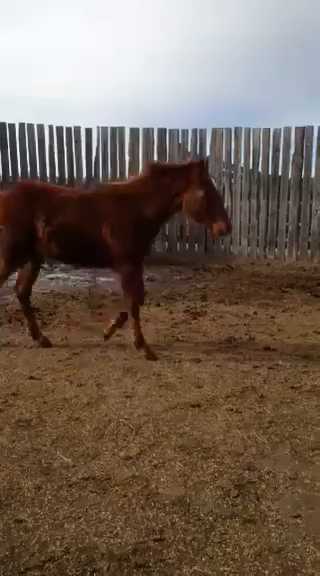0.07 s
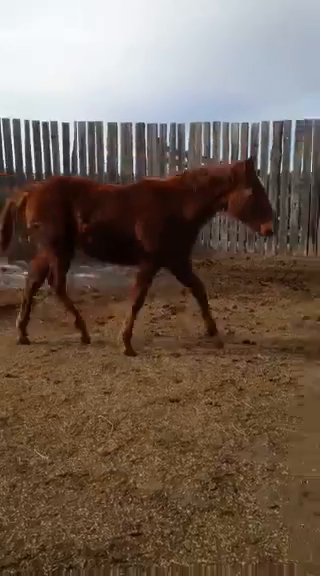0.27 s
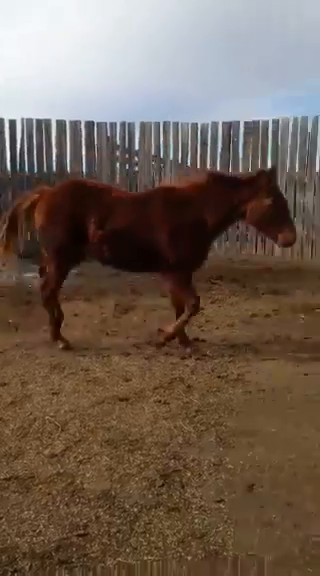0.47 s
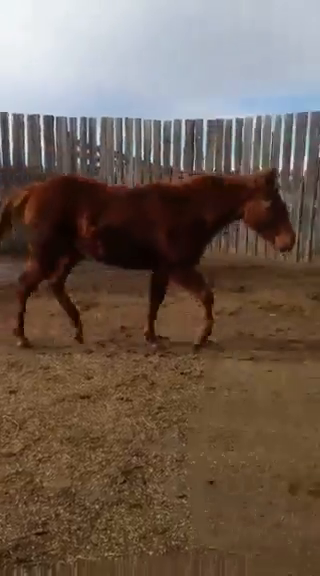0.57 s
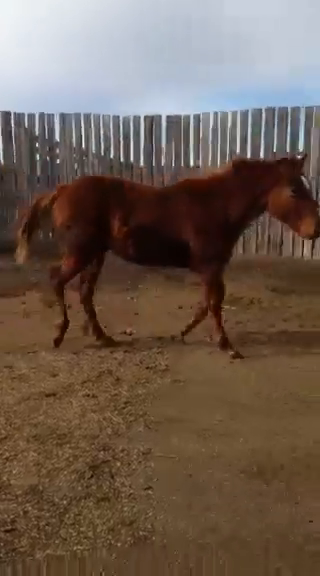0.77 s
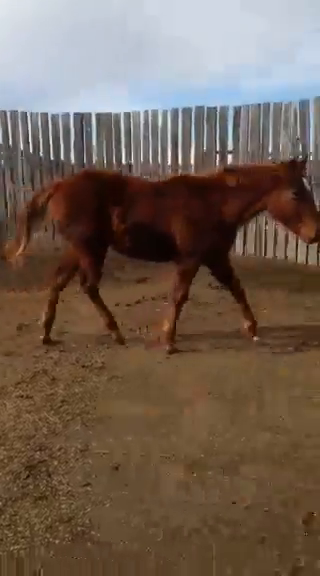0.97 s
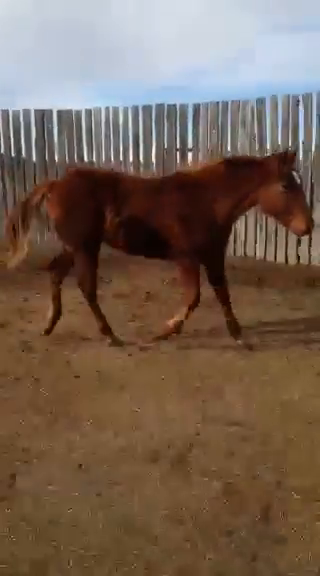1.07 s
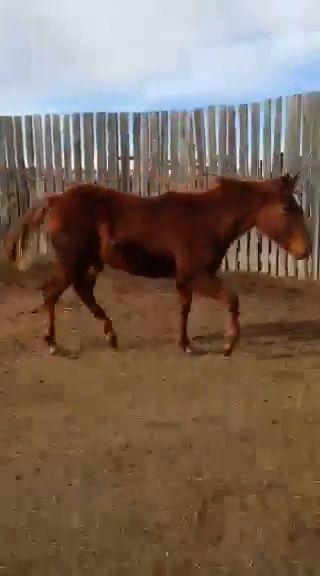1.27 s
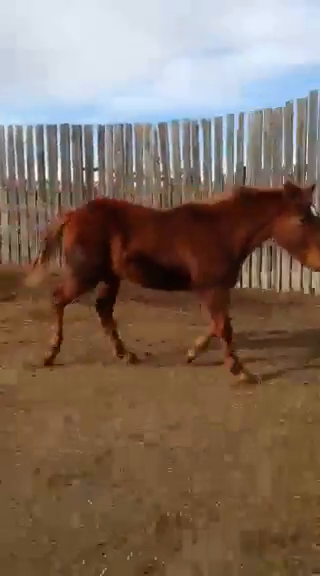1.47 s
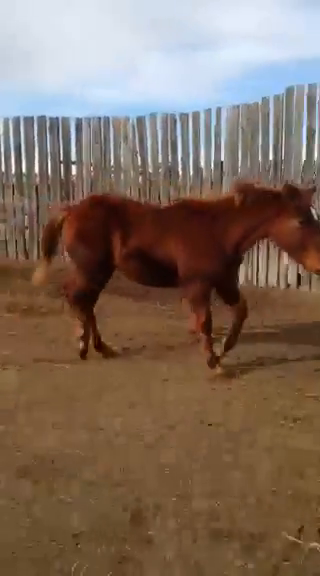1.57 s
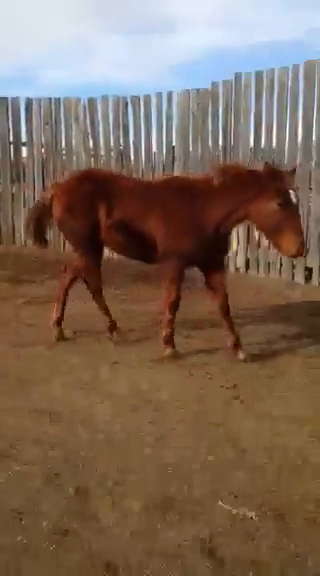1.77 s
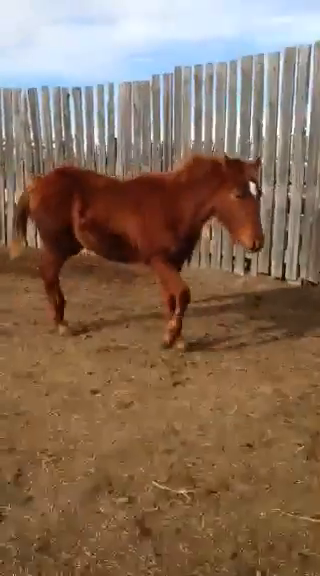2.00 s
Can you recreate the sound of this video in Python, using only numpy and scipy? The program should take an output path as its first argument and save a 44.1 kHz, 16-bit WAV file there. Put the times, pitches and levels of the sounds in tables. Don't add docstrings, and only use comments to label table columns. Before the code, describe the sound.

A horse whinnies close by: the trilling end of one call, a breathy pause, then a longer arched call that breaks, a low grunt, and another call beginning, over dull hoof thumps and wind on the microphone.

```python
import sys
import numpy as np
from scipy import signal
from scipy.fft import rfft, irfft
from scipy.io import wavfile
from scipy.ndimage import uniform_filter1d

SR = 44100
rng = np.random.default_rng(int(sys.argv[2]) if len(sys.argv) > 2 else 0)


def wrap_up_sound(samples):
    columns = np.atleast_2d(samples).T
    tamed = np.clip(columns, -1, 1)
    steps = np.round(tamed * 32767).astype(np.int16)
    wavfile.write(sys.argv[1], SR, steps)


def voltage_ratio(decibels):
    exponent = np.asarray(decibels, float) / 20
    return 10 ** exponent


N = 89919
TIME_S = np.arange(N) / SR
FREQ_HZ = np.fft.rfftfreq(N, 1 / SR)


def follow(table):
    return np.interp(TIME_S, *np.transpose(table))


def evened(x):
    return x / np.sqrt(np.mean(abs(x) ** 2) + 1e-20)


def add(mix, start_s, sound):
    part = mix[max(round(start_s * SR), 0):][:len(sound)]
    part += sound[:len(part)]


def smooth(x, hz):
    return signal.sosfilt(signal.butter(2, hz, fs=SR, output="sos"), x)


def filtered_noise(gain):
    return evened(irfft(rfft(rng.standard_normal(N)) * gain, N))


def coloured(points):
    f, db = np.transpose(points)
    inside_db = np.interp(np.log(FREQ_HZ + 1), np.log(f + 1), db)
    above_octaves = np.log2(np.maximum(FREQ_HZ / f[-1], 1))
    below_octaves = np.log2(np.maximum(f[0] / (FREQ_HZ + 1), 1))
    return filtered_noise(voltage_ratio(inside_db - 24 * above_octaves - 24 * below_octaves))


# centre_hz, width_hz, level_db
THROAT = [(620, 370, -2.5), (1066, 190, 15.5), (1700, 89, 15), (2130, 624, 17), (2645, 1020, 1.5),
          (4096, 1050, 4), (3906, 130, -10.5), (5750, 1900, -10), (6970, 300, -8)]


def breath():
    resonances = sum(voltage_ratio(db) / (1 + (2 * (FREQ_HZ - f) / width) ** 4) for f, width, db in THROAT)
    return filtered_noise(resonances)


LOW_ORDERS = {1: 0., 2: -20, 3: -16.5, 3.5: -20.5, 4: -29, 5: -30, 6: -31.5}
HIGH_ORDERS = {(1, 0): 0., (1, 1): -6, (1, -1): -20, (2, 0): -24, (2, 1): -24.5, (3, 0): -22.5, (3, 1): -28.5, (4, 0): -24.5}


def phrase(rows, rough, breath_db, third_db, top_db, sum_db, nasal_db, air):
    blur_hz, wander_db, wander_hz = 70, 1.1, 18
    edge_s, nasal_hz = .012, 2159
    rows = np.array(rows)
    t = np.arange(rows[0, 0] - edge_s / 2, rows[-1, 0] + edge_s / 2, 1 / SR)
    curves = [np.interp(t, rows[:, 0], column) for column in rows.T[1:]]
    low_hz, low_db, high_hz, high_db = (uniform_filter1d(c, size=400, mode="nearest") for c in curves)
    low = 2 * np.pi * np.cumsum(low_hz) / SR
    high = 2 * np.pi * np.cumsum(high_hz) / SR

    tones = []  # phase, level in dB, order that sets the instability
    for k, db in LOW_ORDERS.items():
        tones.append((k * low, low_db + db + third_db * (k == 3), k))
    for (n, m), db in HIGH_ORDERS.items():
        level_db = high_db + db + top_db * (n > 2) + sum_db * (m > 0)
        tones.append((n * high + m * low, level_db, 2.5 * n + abs(m)))
    tones.append((2 * np.pi * nasal_hz * t, nasal_db, 3))

    out = voltage_ratio(high_db + breath_db) * air[np.minimum((t * SR).astype(int), N - 1)]
    for angle, db, order in tones:
        noise = rng.standard_normal((len(t), 2)) @ [1, 1j]
        share = np.clip(rough * order ** .62, 0, 1)
        flutter = np.sqrt(1 - share ** 2) + share * evened(smooth(noise, blur_hz * order ** .5))
        drift_db = wander_db * min(order - .6, 2) * evened(smooth(noise.real, wander_hz))
        out = out + np.sqrt(2) * voltage_ratio(db + drift_db) * (flutter * np.exp(1j * angle)).real
    edge = np.clip(np.minimum(t - t[0], t[-1] - t) / edge_s, 0, 1)
    return t[0], out * np.sin(np.pi / 2 * edge) ** 2


# time_s, low_hz, low_db, high_hz, high_db
TRILL = [(.125, 679.7, -36, 1745, -47.5), (0.145, 711.2, -31.5, 1768, -41.5),
         (0.165, 626, -45, 1657, -44.5), (0.183, 681, -38.5, 1755, -42), (0.196, 716.4, -31, 1720, -46),
         (0.236, 687, -33.5, 1729, -43), (0.253, 601, -41, 1645, -45.5), (0.28, 546, -41.5, 1567, -47.5)]
SAG = [(.28, 685.5, -39.5, 1715, -42.5), (0.302, 693.8, -35.5, 1720, -45),
       (0.329, 677.6, -33.5, 1663, -42.5), (0.343, 600, -52.5, 1617, -43.5),
       (0.369, 566.3, -39, 1477, -43.5), (0.399, 632.7, -36, 1600, -53), (0.426, 584.5, -45.5, 1586, -41.5),
       (0.469, 551.2, -37, 1475, -65), (0.502, 548, -53, 1440, -65.5)]
RISE = [(.86, 553.6, -53, 1175, -94), (0.912, 551.4, -45.5, 1255, -63.5), (0.943, 578.5, -39, 1406, -49.5),
        (0.968, 617.8, -44.5, 1566, -49), (1.002, 617.4, -59, 1613, -50.5), (1.033, 677, -69, 1703, -45),
        (1.06, 665, -45, 1675, -45), (1.089, 677, -33.5, 1735, -42)]
HOLD = [(1.09, 677, -38, 1749, -44), (1.123, 700.7, -34, 1795, -47.5), (1.159, 699.2, -34.5, 1797, -49),
        (1.184, 719, -35.5, 1830, -42.5), (1.219, 716.2, -36, 1836, -44), (1.244, 709.8, -39.5, 1800, -47),
        (1.282, 715.5, -39.5, 1794, -46), (1.305, 709, -33.5, 1790, -47), (1.322, 710, -40, 1785, -46.5)]
DROOP = [(1.32, 696.7, -58, 1787, -42), (1.334, 685.3, -37, 1760, -53.5), (1.359, 688.6, -41.5, 1774, -44),
         (1.383, 697.5, -41, 1761, -45.5), (1.398, 675, -62.5, 1690, -41.5)]
BREAK = [(1.397, 620, -53, 1638, -47.5), (1.414, 587, -34, 1589, -43), (1.449, 600, -44.5, 1623, -41.5),
         (1.463, 613.2, -45.5, 1629, -37.5), (1.48, 620, -46.5, 1567, -46),
         (1.494, 573.7, -33, 1636, -50.5), (1.509, 569.7, -50.5, 1609, -41.5),
         (1.524, 647, -37.5, 1667, -55), (1.566, 510, -51.5, 1603, -56)]
AGAIN = [(1.955, 578.4, -51, 1383, -64), (1.978, 522, -45, 1415, -71), (1.992, 545, -38, 1418, -56),
         (1.999, 568.5, -44, 1428, -41.5), (2.014, 582, -47, 1505, -45.5), (2.028, 620, -52.5, 1568, -51),
         (2.045, 656, -44.5, 1530, -42.5)]
ROUGH = [.19, .22, .08, .12, .14, .22, .06]
# breath_db (re high voice), third_overtone_lift_db,
# top_tones_lift_db, sum_tone_lift_db, nasal_ring_db
VOICING = [
    (-1.5, 5, -5, 2, -48),
    (-2.5, 0.5, -14, 0.5, -46.5),
    (-11.5, -8.5, -1, 0.5, -81),
    (-10.5, 4.5, 2.5, 2, -80.5),
    (-17.5, 11, 2, 1, -72.5),
    (-14.5, 7.5, -1.5, -1, -55.5),
    (-33, -2, -9, -8, -75),
]


def horse():
    air = breath()
    voice = sighs(air)
    for rows, rough, voicing in zip((TRILL, SAG, RISE, HOLD, DROOP, BREAK, AGAIN), ROUGH, VOICING):
        add(voice, *phrase(rows, rough, *voicing, air))
    return voice + voltage_ratio(-14) * fence(voice) + grunt()


# time_s, level_db
GUST = [(.13, -42.5), (0.301, -48.5), (.42, -51), (0.548, -47.5), (0.782, -49), (0.948, -38), (1.05, -37),
        (1.23, -38), (1.45, -39.5), (1.6, -50), (1.75, -56), (1.929, -50.5), (2.04, -40)]
# frequency_hz, density_db (per Hz)
WIND = [(25, -24), (65, 3.5), (130, -3), (220, -11.5), (330, -23.5), (500, -23)]


def wind():
    lump_db, lumps_per_s = 2, 16
    lumps = evened(smooth(rng.standard_normal(N), lumps_per_s))
    return voltage_ratio(follow(GUST)) * evened(voltage_ratio(lump_db * lumps) * coloured(WIND))


# frequency_hz, density_db (per Hz)
AIR = [(260, -8.5), (400, -3), (620, -3.5), (900, -7), (1900, -9), (2800, -21.5), (4500, -21.5),
       (7900, -30.5)]
# time_s, lift_db
RUSTLE = [(.13, -7.5), (.55, 1.5), (.65, -1.5), (.9, -3), (1.0, 1), (1.45, 2), (1.65, 4), (1.799, 1.5),
          (2.04, 4.5)]


def open_air():
    air_db, patch_db, patches_per_s = -56.5, 1.2, 8
    patches = evened(smooth(rng.standard_normal(N), patches_per_s))
    return voltage_ratio(air_db + follow(RUSTLE) + patch_db * patches) * coloured(AIR)


# centre_s, level_db, length_s
SCUFFS = [
    (.134, -47, .012),
    (.435, -55, .03),
    (.59, -58, .025),
    (.93, -48, .006),
    (1.63, -58, .03),
]


def scuffs():
    out = np.zeros(N)
    grit = np.diff(rng.standard_normal(N + 1) * rng.exponential(1, N + 1)) / 2
    for centre_s, db, length_s in SCUFFS:
        size = round(length_s * SR)
        burst = grit[round(centre_s * SR):][:size]
        add(out, centre_s - length_s / 2, voltage_ratio(db) * np.hanning(size) * burst)
    return out


# start_s, peak_db, pitch_hz
THUMPS = [(0.153, -40, 270), (0.2, -46.5, 100), (0.347, -44, 74), (.481, -31.5, 133), (0.52, -35.5, 135),
          (0.532, -37, 106), (0.558, -39, 177), (0.856, -38, 176), (0.92, -29.5, 152), (.935, -34, 110),
          (1.014, -26, 87.4), (1.059, -35.5, 75), (1.088, -29, 119), (1.106, -29.5, 238),
          (1.161, -44, 72.6), (1.188, -31.5, 66), (1.201, -38, 65), (1.229, -31.5, 70), (1.307, -27, 177),
          (1.35, -36, 123), (1.384, -33, 64.5), (1.398, -31.5, 141), (1.439, -41, 113),
          (1.646, -38.5, 203.8), (1.667, -37.5, 190), (1.936, -40, 190), (2.015, -35, 152)]


def thumps():
    out = np.zeros(N)
    for start_s, db, hz in THUMPS:
        cycles = 0.6 + hz / 170
        u = np.arange(0, 4 * cycles / hz, 1 / SR) * hz / cycles
        push = 3 * u * np.exp(1 - 3 * u ** 1.89)
        glide = 1.25 - 0.3 * np.minimum(u, 1.5)
        add(out, start_s, voltage_ratio(db) * push * np.sin(2 * np.pi * cycles * u * glide))
    return out


def fence(x):
    delay_s, t60_s, spacing, treble_hz = .03, 0.54, 40, 4000
    taps = np.zeros(SR)
    at = np.arange(round(delay_s * SR), SR - spacing, spacing)
    place = rng.random((len(at), 2))
    taps[at + (spacing * place[:, 0]).astype(int)] = np.sign(place[:, 1] - .5)
    taps = smooth(taps * voltage_ratio(-60 * np.arange(SR) / SR / t60_s), treble_hz)
    return signal.fftconvolve(x, taps / np.linalg.norm(taps))[:N]


# start_s, peak_s, end_s, level_db
SIGHS = [
    (0.394, 0.46, 0.73, -44),
    (0.82, 0.893, 1.2, -55),
    (1.449, 1.563, 1.805, -43),
    (1.93, 1.985, 2, -47.5),
]


def sighs(air):
    centre_hz, width_hz, top_db, fade_db = 600, 430, -5.5, -32.5
    flutter_db, flutter_hz = 2.6, 21
    low = filtered_noise(1 / (1 + (2 * (FREQ_HZ - centre_hz) / width_hz) ** 4))
    strength = np.zeros(N)
    for start_s, peak_s, end_s, db in SIGHS:
        swell_db = np.interp(TIME_S, [start_s, peak_s, end_s], [fade_db, 0, fade_db], -99, -99)
        strength += voltage_ratio(db + swell_db)
    flutter = voltage_ratio(flutter_db * evened(smooth(rng.standard_normal(N), flutter_hz)))
    return strength * flutter * (low + voltage_ratio(top_db) * air)


# time_s, level_db
GRUNT = [
    (1.6, -55.5),
    (1.645, -35),
    (1.68, -40),
    (1.71, -49),
    (1.85, -48.5),
    (1.94, -48.5),
    (2.04, -39.5),
]


def grunt():
    chest_hz, width_hz = 188, 55
    body = filtered_noise(1 / (1 + (2 * (FREQ_HZ - chest_hz) / width_hz) ** 2))
    return voltage_ratio(np.interp(TIME_S, *np.transpose(GRUNT), left=-99)) * body


def scene():
    return (horse() + wind() + open_air() + scuffs() + thumps())[None]


# time_s, threshold_lift_db
SHORT = [(0, 0), (.77, 0), (.8, 5), (.85, 4), (.87, 0), (1.34, 0), (1.37, 12), (1.6, 12), (1.62, 0),
         (1.66, 0), (1.69, 11), (1.79, 10), (1.81, 2), (1.84, 2), (1.86, 10), (1.96, 9), (2.04, 8)]


def gate_faint(x):
    mask_db, luck_db = -19, 3
    deaf_hz, deaf_width_hz, deaf_db = 3030, 260, 11
    hush_db, hush_hz, hush_width_hz, hush_reach_db = -95, 2900, 750, 14
    hz, t, z = signal.stft(x, SR, nperseg=2048, noverlap=1536)
    f = hz[:1024, None]
    power = uniform_filter1d(abs(z) ** 2, size=3, axis=1)
    band = np.repeat(power[:1024].reshape(256, 4, -1).mean(1), 4, axis=0)
    wide = np.repeat(power[:1024].reshape(128, 8, -1).mean(1), 8, axis=0)
    around = uniform_filter1d(power, size=30, axis=0, origin=7)[:1024]
    luck = rng.standard_normal((128, z.shape[1] // 5 + 1))
    luck = luck_db * np.kron(luck, np.ones((8, 5)))[:, :z.shape[1]]

    limit_db = mask_db + deaf_db * np.exp(-((f - deaf_hz) / deaf_width_hz) ** 2)
    limit_db = limit_db + luck - 4 * (f < 650)
    over_mask_db = 10 * np.log10(band / (around + 1e-20) + 1e-9) - limit_db
    floor_db = hush_db + np.interp(t, *np.transpose(SHORT))
    floor_db = floor_db - hush_reach_db * ((f - hush_hz) / hush_width_hz) ** 2
    over_floor_db = 10 * np.log10(wide + 1e-20) - floor_db - luck
    keep = np.ones(z.shape)
    keep[:1024] = np.clip(np.minimum(over_mask_db, over_floor_db) / 2, .04, 1)
    return signal.istft(z * keep, SR, nperseg=2048, noverlap=1536)[1][:N]


def roll_off(x):
    return signal.sosfilt(signal.butter(12, 8140, fs=SR, output="sos"), x)


def record(dry):
    start_s, rise_s, edge_hz = .1305, 0.00047, 8200
    mix = gate_faint(dry[0])[None] * np.clip((TIME_S - start_s) / rise_s, 0, 1)
    lowpass = signal.firwin(511, edge_hz, window=("kaiser", 9), fs=SR)
    mix = signal.oaconvolve(mix, lowpass[None], "same")
    return roll_off(mix)


dry = scene()
out = record(dry)
wrap_up_sound(out)
```